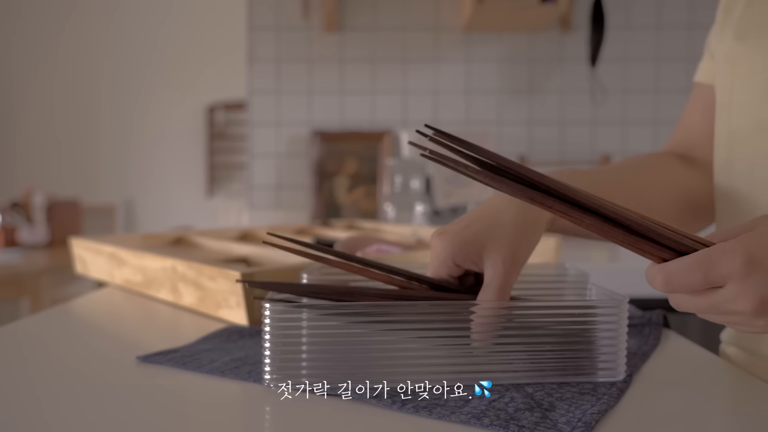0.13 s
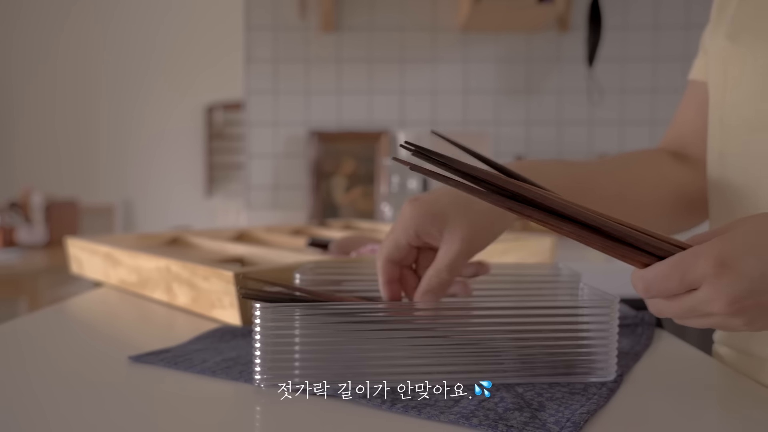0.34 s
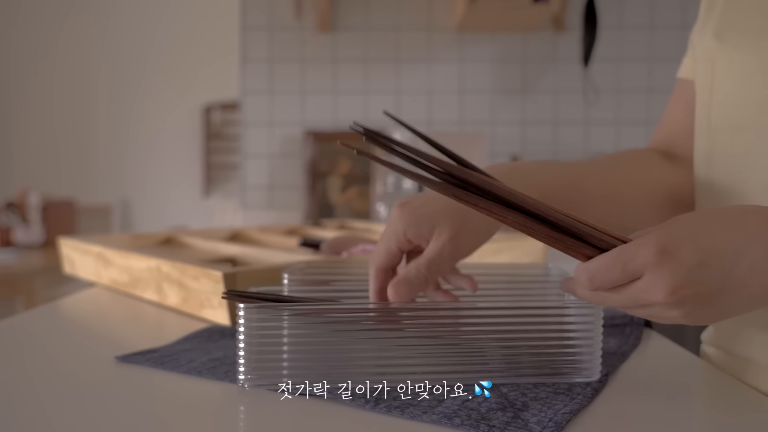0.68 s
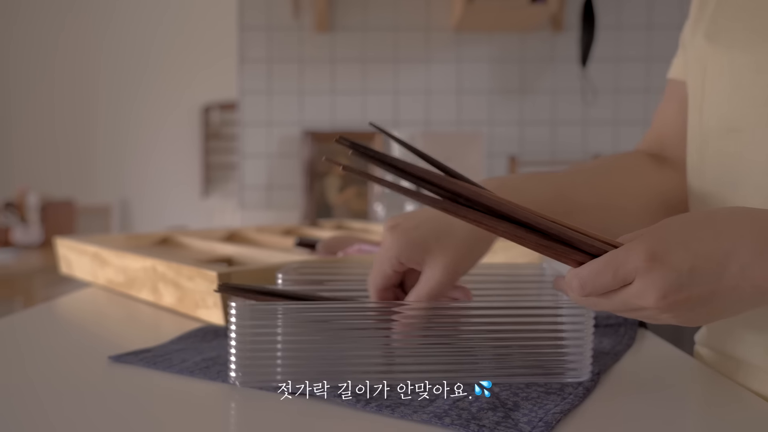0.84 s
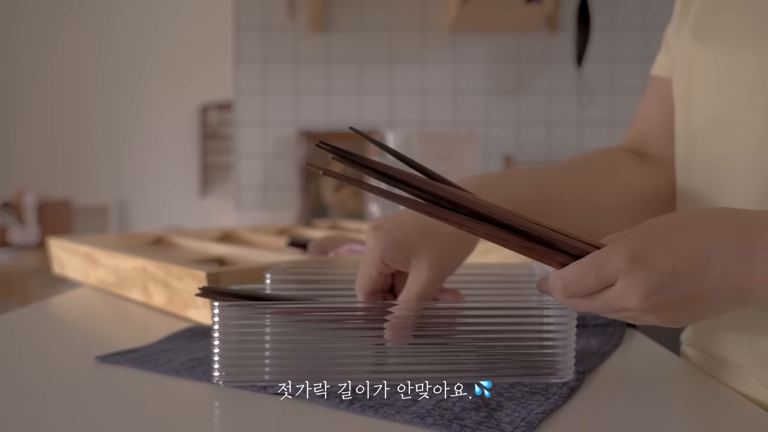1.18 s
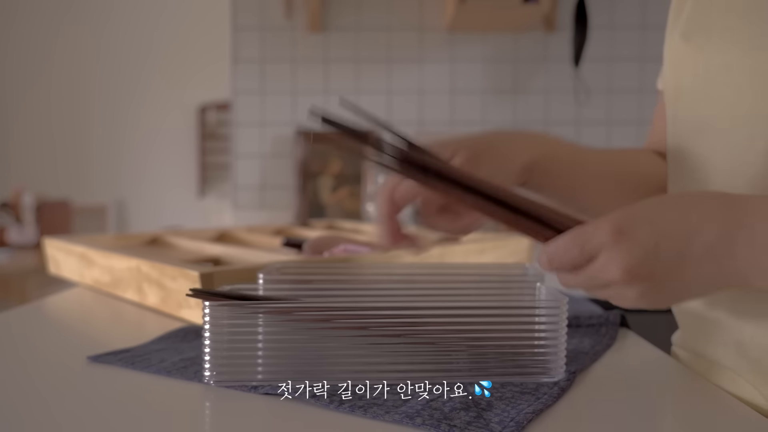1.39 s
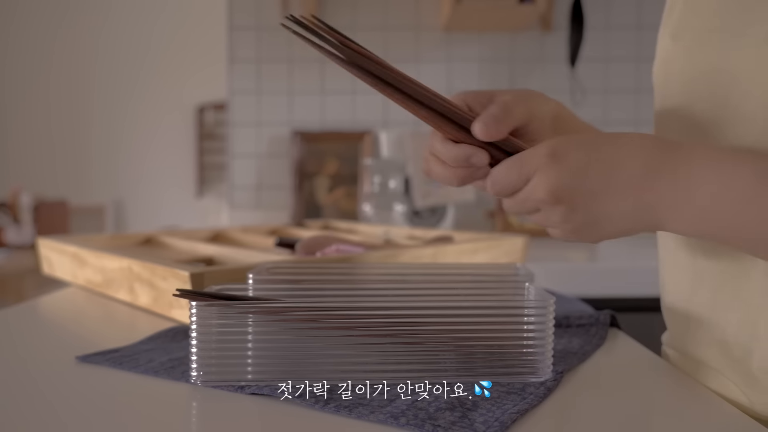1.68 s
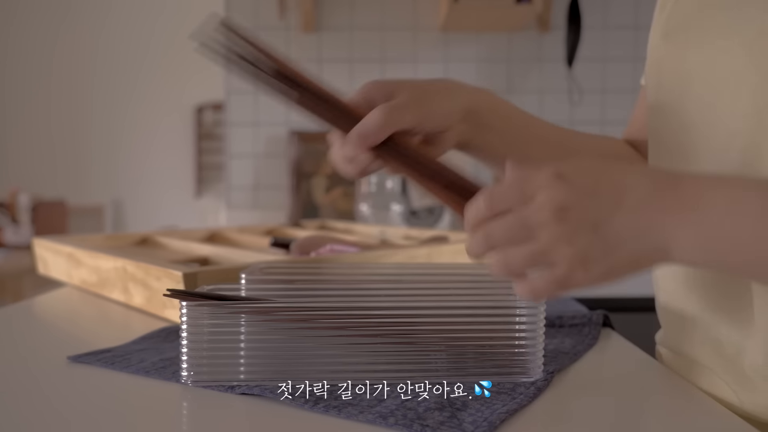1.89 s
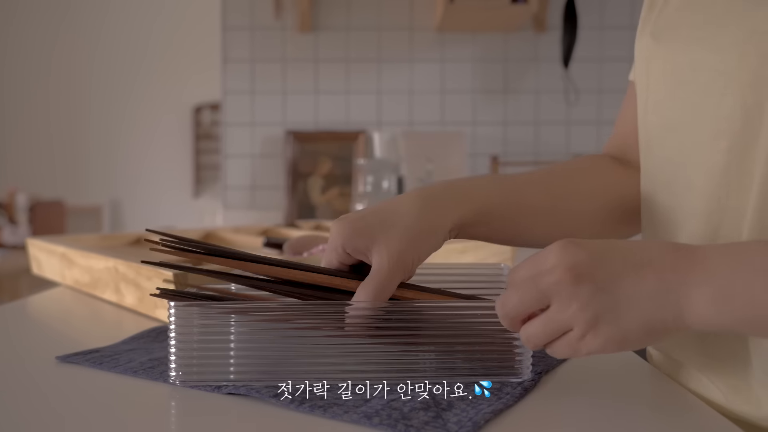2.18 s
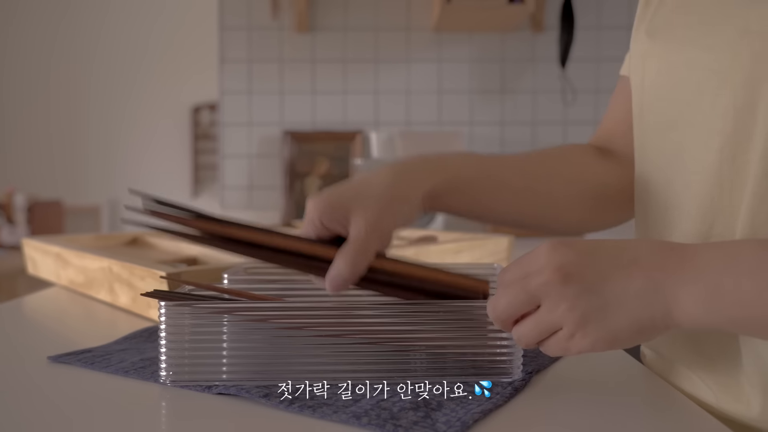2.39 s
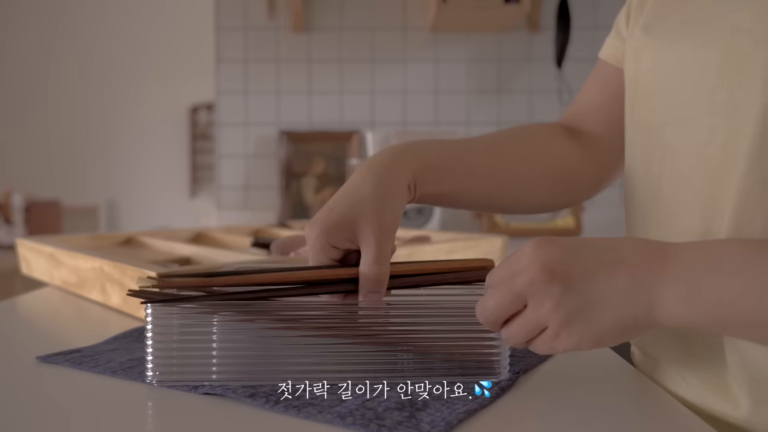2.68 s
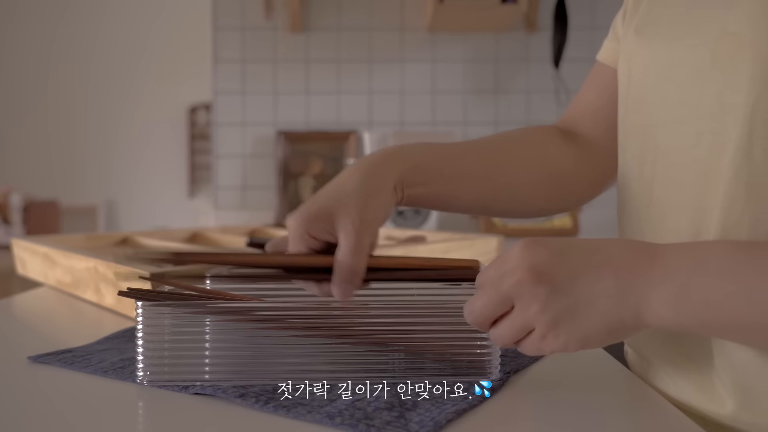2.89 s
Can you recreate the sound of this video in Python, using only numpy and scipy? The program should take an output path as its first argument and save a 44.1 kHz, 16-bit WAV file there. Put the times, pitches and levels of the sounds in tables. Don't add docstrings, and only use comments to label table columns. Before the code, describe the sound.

Wooden chopsticks clatter in a hollow plastic holder: a faint slide, a dense loud rattle, scattered knocks, light stick clicks, then two heavier bursts. Close stereo microphone in a small tiled kitchen, faint fridge hum.

```python
import sys
import numpy as np
from scipy import signal
from scipy.fft import rfft, irfft, next_fast_len
from scipy.io import wavfile
from scipy.ndimage import map_coordinates

SR = 44100
rng = np.random.default_rng(int(sys.argv[2]) if len(sys.argv) > 2 else 0)


def file_out(sig):
    cols = np.atleast_2d(sig).T
    lim = np.clip(cols, -1, 1)
    pcm = np.round(lim * 32767).astype(np.int16)
    wavfile.write(sys.argv[1], SR, pcm)


def elevation(decibels):
    levels = np.asarray(decibels, float)
    return 10 ** (levels / 20)


N = 134505


def unit(x):
    return x / np.sqrt(np.mean(x ** 2) + 1e-20)


def along(points, hz):
    f, v = np.transpose(points)
    return np.interp(np.log(hz + 1), np.log(f + 1), v)


def filtered(x, response):
    m = next_fast_len(x.shape[-1] + 8192)
    gain = response(np.fft.rfftfreq(m, 1 / SR))
    return irfft(rfft(x, m) * gain, m)[..., :x.shape[-1]]


def pair(alike, length):
    def mid_side_gains(hz):
        angle = np.arccos(np.clip(along(alike, hz), -1, 1)) / 2
        return np.array([np.cos(angle), np.sin(angle)])

    mid, side = filtered(rng.standard_normal((2, length)), mid_side_gains)
    return np.array([mid + side, mid - side])


def train(s, gain):
    place = np.clip(np.round(s * SR).astype(int), 0, N - 1)
    return np.bincount(place, gain, N)


MODE_SCATTER_DB = 2.5


def ring(s, gain, colour_db, modes, spread, count, in_step, group=slice(None)):
    out = np.zeros(N)
    luck = rng.standard_normal((len(s), len(modes)))[group]
    which = rng.integers(0, count, len(s))[group]
    sign = np.where(rng.random(luck.shape) < in_step, 1, -1)
    detune = 1 + spread * rng.uniform(-1.32, 1, (count, len(modes)))
    for k, (hz, db, t60) in enumerate(modes):
        size = gain * elevation(db + MODE_SCATTER_DB * luck[:, k] + colour_db(hz)) * sign[:, k]
        r = elevation(-60 / (t60 * SR))
        for copy in range(count):
            w = 2 * np.pi * hz * detune[copy, k] / SR
            blows = train(s, size * (which == copy))
            out += signal.lfilter([0, np.sin(w)], [1, -2 * r * np.cos(w), r * r], blows)
    return out


CHATTER_LOSS_DB = 8.5


def chatter(s, db, length, count, lead_db):
    late = np.sort(rng.random((len(s), count)), axis=1) ** 1.4 * (np.arange(count) > 0)
    rebound = late > 0
    scatter_db = 1.2 * rng.standard_normal(late.shape) * rebound
    level = db[:, None] - CHATTER_LOSS_DB * late - lead_db * rebound + scatter_db
    times = s[:, None] + np.asarray(length)[..., None] * late
    return times.ravel(), elevation(level).ravel()


def struck(s, db, hz, t60, rise_s):
    out, t = np.zeros(N + SR), np.arange(SR // 3) / SR
    for at, level_db, f, life in np.broadcast(s, db, hz, t60):
        envelope = elevation(level_db - 60 * t / life) * (1 - np.exp(-t / rise_s))
        out[round(at * SR):][:len(t)] += envelope * np.sin(2 * np.pi * f * t)
    return out[:N]


# (frequency [Hz], level [dB per Hz])
AIR_SPECTRUM = [(12, -21), (22, -7.5), (65, 2.5), (285, -10.5), (347, -8.5), (2460, -18.5), (10200, -25),
                (15000, -20.5), (16000, -48)]
AIR_DB = -51.5
HUM_HZ, HUM_DB, HUM_LAG = 59.5, -59, 2.5


def room_air():
    noise = pair([(30, 0.14), (300, 0.3), (3000, 0.15)], N)
    air = unit(filtered(noise, lambda hz: elevation(along(AIR_SPECTRUM, hz))))
    sway = map_coordinates(rng.standard_normal(40), [np.arange(N) * 9 / SR])
    lag = HUM_LAG * np.array([[.5], [-.5]])
    hum = np.sin(2 * np.pi * HUM_HZ * np.arange(N) / SR + 0.23 * sway + lag)
    return elevation(AIR_DB) * air + elevation(HUM_DB + 11.0 * sway[::-1]) * hum


# (time [s], holder level [dB], sticks over holder [dB])
SLIDE_LEVELS = [(0, -24.5, 1), (0.239, -48, -16), (.3, -21, -7.5), (.47, -15, 1.5), (0.578, -14.5, -6.5),
                (.68, -37, -1.5), (1.121, -29, -0.5), (1.19, -14.5, -8.5), (1.229, -29.5, -9),
                (1.277, -19.5, -6), (1.421, -68, -13), (1.65, -48, 3), (2.189, -73.5, -8.5),
                (2.25, -29.5, 0), (2.655, -36, -8), (2.69, -14, -1.5), (2.838, -22, 6), (3.0, -37, -3.5)]
RATTLE_PER_S, RATTLE_SCATTER_DB = 1500, 2


def rattle():
    luck = rng.random((int(RATTLE_PER_S * N / SR), 2))
    s = luck[:, 0] * N / SR
    size_db = -RATTLE_SCATTER_DB * np.log(1 - luck[:, 1])
    at, holder_db, over_db = np.transpose(SLIDE_LEVELS)
    on_holder = elevation(np.interp(s, at, holder_db) + size_db - 15.5)
    on_sticks = elevation(np.interp(s, at, holder_db + over_db) + size_db - 22.5)
    return s, on_holder, on_sticks


# (time [s], peak level [dB], strongest pitch [Hz])
HOLDER_KNOCKS = [(0.258, -6.5, 1310), (0.271, -5.5, 1180), (0.364, -9.5, 1225), (0.415, -4.5, 1224),
                 (0.442, -2, 1257), (0.456, -3, 1350), (0.476, -8, 985), (0.528, -2.5, 1370),
                 (0.568, -1, 1270), (0.705, -5.5, 1247), (0.727, -12, 1230), (0.739, -14, 1310),
                 (0.851, -4.5, 1280), (0.939, -9.5, 1200), (1.007, -13, 1140), (1.052, -4, 1170),
                 (1.063, -4.5, 1220), (1.185, -23, 1330), (1.297, -5.5, 1250), (1.516, -6, 1154),
                 (2.204, -7, 1163), (2.242, -5.5, 1194), (2.3357, 0, 1343), (2.676, -0.5, 957),
                 (2.687, -9, 1150), (2.701, -3, 1250), (2.717, -0.5, 1190), (2.732, -12, 1310),
                 (2.778, -4.5, 1205), (2.788, -8, 1220), (2.834, -9.5, 1280), (2.874, -12, 1130)]
# (time [s], peak level [dB], chatter length [s])
RIB_KNOCKS = [(0.168, -18.5, 0.015), (0.299, -6.5, 0.024), (0.389, 1.5, 0.014), (0.804, -17, 0.018),
              (0.847, -5, 0.018), (0.861, -8, 0.024), (0.931, -9, 0.025), (1.074, -5, 0.021),
              (1.3, -7.5, 0.016), (1.363, -11, 0.015), (1.451, -15.5, 0.021), (1.507, -11, 0.018),
              (2.127, -40.5, 0.022), (2.203, -6, 0.019), (2.235, 0.5, 0.023), (2.255, -5.5, 0.022),
              (2.466, -0.5, 0.035), (2.485, -11.5, 0.024), (2.629, -13, 0.026), (2.666, 1, 0.023),
              (2.751, -4.5, 0.022), (2.8, -2, 0.035)]
# (frequency [Hz], level [dB], t60 [s])
HOLDER_MODES = [(580, -16.5, 0.054), (782, -23, 0.084), (920, -37, 0.013), (985, -28, 0.14),
                (1092.4, -0.5, 0.027), (1207, -4, 0.075), (1277, -4.5, 0.027), (1360, -2.5, 0.022),
                (1414.5, -5.5, 0.049), (1646, -10, 0.062), (1830, -7.5, 0.03), (2108, -9, 0.035),
                (2905, -11.5, 0.049), (3870, -13.5, 0.09)]
HOLDER_SPREAD, KNOCK_DB = 0.023, -10.5
FOCUS_DB = 15
POP_DB, POP_T60 = -0.5, 0.016
CONTACT_S = 0.00023


def holder(slide_s, slide_gain):
    at, db, pitch = np.transpose(HOLDER_KNOCKS)

    def focus(hz):
        return -FOCUS_DB * np.minimum(2 * np.abs(np.log2(hz / pitch)), 1)

    sharp = ring(at, elevation(db + KNOCK_DB + 1.5), focus, HOLDER_MODES, HOLDER_SPREAD, count=2, in_step=0.91)
    pop = struck(at, db + POP_DB, pitch, POP_T60, rise_s=0.00064)
    s, gain = chatter(*np.transpose(RIB_KNOCKS), count=9, lead_db=1.0)
    s, gain = np.r_[s, slide_s], np.r_[elevation(KNOCK_DB - 4) * gain, slide_gain]
    loose = ring(s, gain, lambda hz: 0, HOLDER_MODES, HOLDER_SPREAD, count=4, in_step=.7)
    push = np.exp(-np.log(1000) * (np.arange(-20, 21) / (CONTACT_S * SR)) ** 2)
    return np.convolve(sharp + pop + loose, push / push.sum(), "same")


# (time [s], peak level [dB], brightness [dB per octave])
STICK_CLICKS = [(0.0024, -20, 4.5), (0.099, -23, 11.5), (0.107, -31, 4), (0.168, -33.5, -13), (0.2571, -7.5, -5),
                (0.2992, -7, 1), (0.363, -17, 4), (0.3887, -6.5, 5), (0.4169, -6.5, -2), (0.4419, -10, -2),
                (0.455, -9.5, 4), (0.4748, -9, 5), (0.489, -6.5, 1), (0.5158, -6, 3.5), (0.528, -12, 1),
                (0.5432, -12, -1), (0.5659, -9.5, -5.5), (0.7024, -7.5, -1), (0.846, -8.5, 1.5),
                (0.854, -15.5, -3), (0.8889, -22.5, -3), (0.9323, -25, -3), (0.9457, -20, -4),
                (1.0055, -28.5, -5), (1.0527, -7.5, -6.5), (1.064, -14.5, -1.5), (1.075, -16, 1),
                (1.1645, -27, -11), (1.1844, -21, -6.5), (1.2961, -15, -4.5), (1.362, -31, -7),
                (1.4573, -35.5, -10),
                (1.509, -22, 0), (1.516, -8, 1.5), (1.57, -21, -3), (1.6119, -23, 0), (1.639, -17.5, 0),
          (1.6486, -19, 5), (1.7377, -27, -1), (1.7572, -10, 2.5), (1.7847, -23, -3.5), (1.855, -8, 3),
          (1.8774, -40.5, 9), (2.1283, -38.5, 1.5), (2.2025, -8, 0.5), (2.2368, -7.5, -4.5),
          (2.242, -14, -2), (2.256, -9.5, -2), (2.273, -13.5, -8.5), (2.3355, -11, -8.5),
          (2.4738, -5, -0.5), (2.482, -10.5, -1.5), (2.4965, -11.5, -4), (2.6669, -7.5, 0.5),
          (2.6749, -10, -3), (2.6864, -15, -1), (2.701, -14, -6), (2.7141, -9.5, 8), (2.7289, -10.5, 8.5),
          (2.733, -13, -1), (2.751, -11.5, 3), (2.762, -10, 0), (2.777, -13, 4), (2.798, -17.5, 4)]
# (frequency [Hz], level [dB], t60 [s])
STICK_MODES = [(1940, 0.5, 0.0067), (2464, -2, 0.015), (3370, -2.5, 0.014), (4136, -6, 0.013),
               (4880, -8.5, 0.016), (5740, -0.5, 0.016), (6840, -4, 0.017), (7630, -4.5, 0.015),
               (9640, -11, 0.018), (12130, -11.5, 0.011)]
# (frequency [Hz], level [dB])
CRACK_SPECTRUM = [(300, -19.5), (1500, -40), (4000, 15.5), (8000, 6), (13500, -9.5), (16200, -27.5)]
STICK_SPREAD, CLICK_DB, CLICK_CHATTER_S = 0.069, -11.5, .014
PIVOT_HZ = 4730
CRACK_DB, CRACK_T60, CRACK_SPLIT_HZ = -3, 0.0098, 6000


def sticks(slide_s, slide_gain):
    at, db, bright = np.transpose(STICK_CLICKS)
    s, gain = chatter(at, db, CLICK_CHATTER_S, count=10, lead_db=7)
    tilt = np.r_[np.repeat(bright, len(s) // len(at)), 0 * slide_s - 1.5]
    stick = np.arange(len(s)) // (len(s) // (2 * len(at)))
    same = np.r_[stick, len(s) + np.arange(len(slide_s))]
    s, gain = np.r_[s, slide_s], np.r_[elevation(CLICK_DB) * gain, slide_gain]

    def burst(lean):
        decay = elevation(-60 / (CRACK_T60 * SR))
        envelope = signal.lfilter([1], [1, -decay], train(s, gain * elevation(lean * tilt)))
        return envelope * rng.standard_normal(N)

    def crack_bands(hz):
        upper = 1 / (1 + (CRACK_SPLIT_HZ / (hz + 1)) ** 4)
        return elevation(along(CRACK_SPECTRUM, hz)) * [1 - upper, upper]

    def brightness(hz):
        return tilt * np.log2(hz / PIVOT_HZ)

    crack = filtered(np.array([burst(-.4), burst(1.1)]), crack_bands).sum(axis=0)
    tone = ring(s, gain, brightness, STICK_MODES, STICK_SPREAD, count=6, in_step=.5, group=same)
    return tone + elevation(CRACK_DB) * crack


# (time [s], peak level [dB], frequency [Hz], t60 [s])
LONE_RINGS = [(0.001, -42.5, 517, 0.097), (0.169, -27, 1210, 0.089), (0.3, -20, 10000, 0.025),
              (0.3, -23, 5900, .025), (0.39, -17, 3800, 0.04), (0.442, -13, 4600, .03),
              (0.848, -11.5, 1082, 0.077), (0.848, -10, 1367, 0.048), (1.053, -7, 1206, 0.14),
              (1.056, -22, 748, 0.27), (1.053, -20, 1460, 0.045), (1.053, -29, 4194, 0.077),
              (1.13, -29.5, 752, 0.4), (1.298, -15, 1211, .095), (1.297, -22, 1440, 0.053),
              (1.512, -21, 1093, 0.03), (1.516, -19.5, 5647, 0.057), (1.758, -32, 7700, .035),
              (1.855, -24.5, 2450, .08), (2.129, -47, 2450, 0.065), (2.337, -27.5, 3871, 0.14),
              (2.474, -21, 4183, .045), (2.474, -25, 2342, 0.019), (2.75, -19, 5965, .06),
              (2.786, -25, 5965, .06)]


def free_rings():
    return struck(*np.transpose(LONE_RINGS), rise_s=0.00078)


# (frequency [Hz], likeness [-1 to 1])
SCATTER_ALIKE = [(1000, 1), (3000, 0.12), (10000, -0.77)]
# (frequency [Hz], level [dB])
SCATTER_SPECTRUM = [(1500, -3.5), (2500, -0.5)]
COUNTER_S, COUNTER_DB = 0.0058, -2


def counter(near, size=2048, order=512):
    x = filtered(near, lambda hz: elevation(along(SCATTER_SPECTRUM, hz)))
    out = np.zeros((2, N + SR))
    for a in range(0, N, size):
        z = pair(SCATTER_ALIKE, order) * np.exp(-np.arange(order) / (COUNTER_S * SR))
        echo = signal.fftconvolve(x[None, a:a + size], z / np.linalg.norm(z[0]), axes=1)
        out[:, a:a + echo.shape[1]] += echo
    return elevation(COUNTER_DB) * out[:, :N]


# (frequency [Hz], t60 [s])
KITCHEN_T60 = [(200, 0.92), (1000, 0.35), (4000, 0.42), (10000, 0.39), (16000, 0.033)]
# (frequency [Hz], likeness [-1 to 1])
KITCHEN_ALIKE = [(100, 0.23), (1000, 0.89), (2500, 0.5), (8000, 0.047)]
KITCHEN_DB, KITCHEN_DELAY_S = -6, .004


def kitchen(x, size=8192):
    out, delay = np.zeros((2, N + 2 * SR)), round(KITCHEN_DELAY_S * SR)
    for a in range(0, N, size):
        hz, t, z = signal.stft(pair(KITCHEN_ALIKE, SR * 2 // 3), SR, nperseg=256)
        fade = elevation(-60 * t / along(KITCHEN_T60, hz)[:, None])
        tail = signal.istft(z * fade, SR, nperseg=256)[1]
        wet = signal.fftconvolve(x[None, a:a + size], tail / np.linalg.norm(tail[0]), axes=1)
        out[:, a + delay:a + delay + wet.shape[1]] += wet
    return elevation(KITCHEN_DB) * out[:, :N]


# (time [s], peak level [dB])
JOLTS = [(0.561, -45.5), (0.699, -47), (0.846, -49), (0.932, -40), (1.06, -36), (1.089, -41),
         (2.196, -39.5), (2.245, -37), (2.331, -35), (2.389, -50), (2.472, -49), (2.67, -35), (2.719, -41),
         (2.797, -39.5)]
# (frequency [Hz], level [dB], t60 [s])
COUNTER_MODES = [(165, -6.5, 0.082), (215.6, -0.5, 0.085), (291, -1, 0.063), (394, -5, 0.037)]
THUD_DB, THUD_RISE_S = -3.5, .003


def thuds():
    s, db = np.transpose(JOLTS)[..., None]
    hz, mode_db, t60 = np.transpose(COUNTER_MODES)
    luck = rng.standard_normal((2, len(s), len(hz)))
    level = db + mode_db + THUD_DB + 3 * luck[0]
    return struck(s, level, hz * (1 + 0.063 * luck[1]), t60, THUD_RISE_S)


BODIES_HIGHPASS_HZ = 798


def scene():
    air = room_air()
    s, on_holder, on_sticks = rattle()
    small = signal.butter(3, BODIES_HIGHPASS_HZ, "high", fs=SR, output="sos")
    bodies = signal.sosfilt(small, holder(s, on_holder) + sticks(s, on_sticks))
    near = bodies + free_rings() + thuds()
    return near + counter(near) + kitchen(near) + air


def top_cut(x):
    return signal.sosfilt(signal.butter(12, 16680, fs=SR, output="sos"), x)


# (frequency [Hz], level [dB])
MIC_RESPONSE = [(15000, 0), (15800, -6), (16300, -14.5), (16800, -25.5)]
TOP, KNEE = 1.03, 8


def record(dry):
    clipped = dry / (1 + np.abs(dry / TOP) ** KNEE) ** (1 / KNEE)
    mix = filtered(clipped, lambda hz: elevation(along(MIC_RESPONSE, hz)))
    return top_cut(mix)


dry = scene()
out = record(dry)
file_out(out)
```